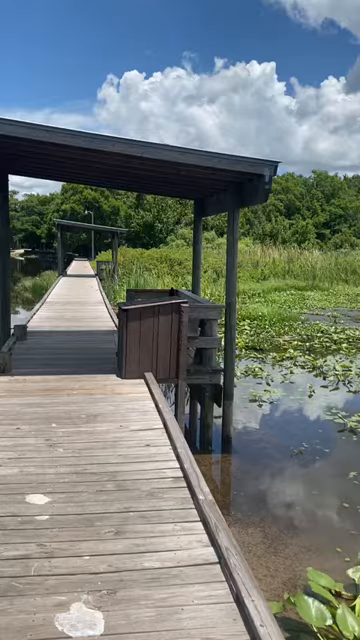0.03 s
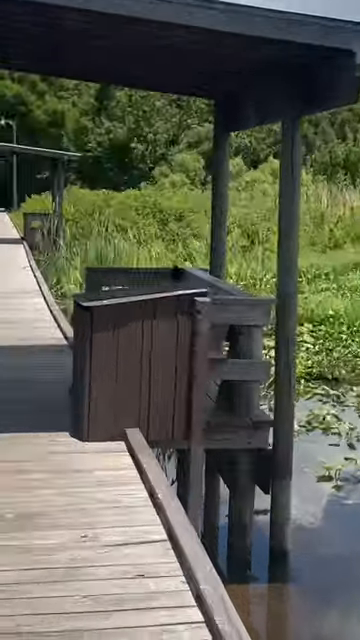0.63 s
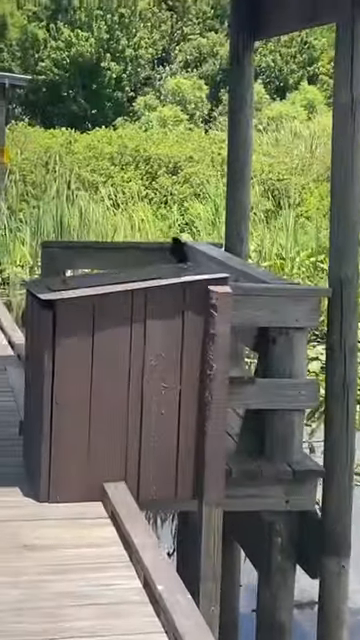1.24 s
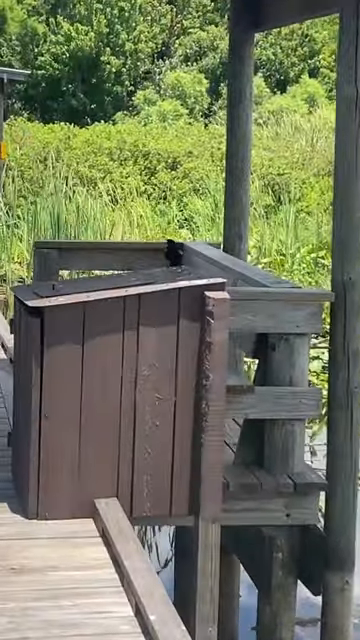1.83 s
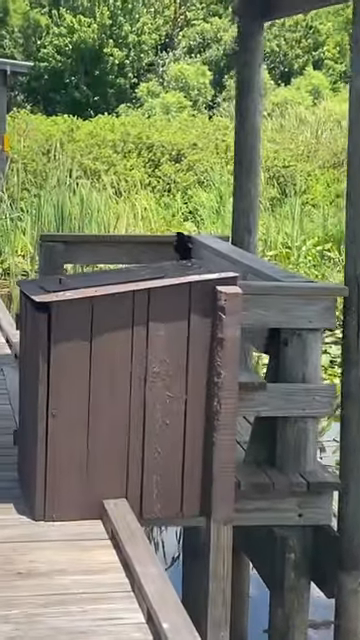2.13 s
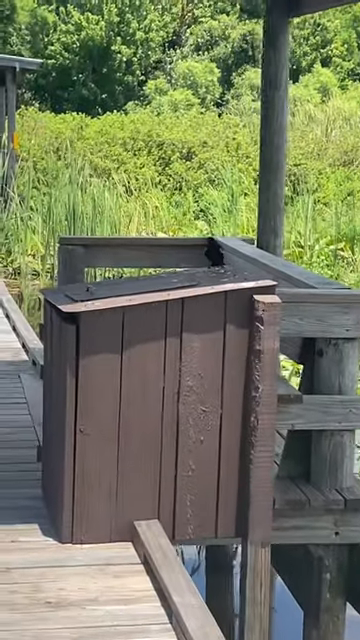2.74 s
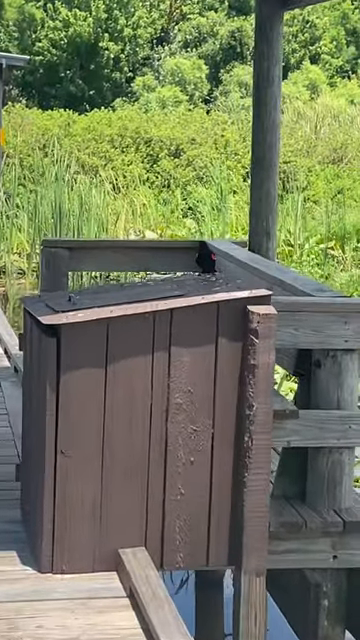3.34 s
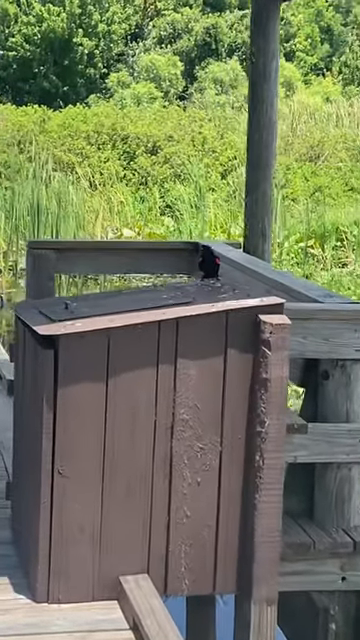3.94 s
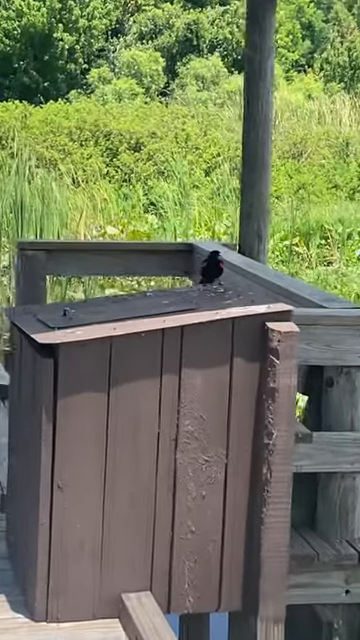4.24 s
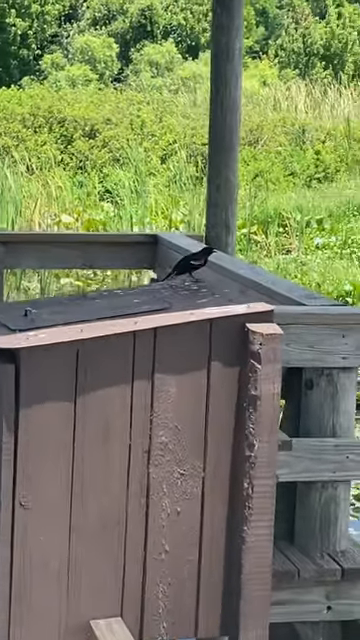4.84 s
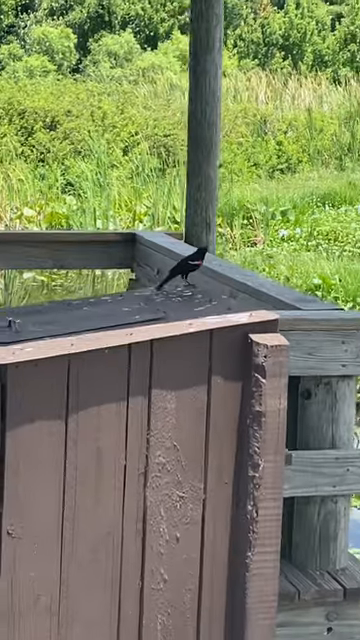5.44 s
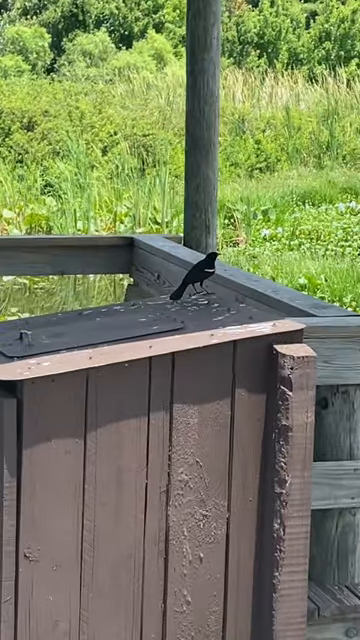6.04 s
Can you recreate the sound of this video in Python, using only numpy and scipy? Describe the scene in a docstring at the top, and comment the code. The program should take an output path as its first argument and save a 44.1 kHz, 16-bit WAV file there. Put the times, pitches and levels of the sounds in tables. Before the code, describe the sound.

An open marsh is heard through a hand-held microphone, with a steady low rumble and very faint insect hiss. At 0.2 seconds a nearby blackbird gives one loud, high, buzzy whistle that drops quickly and holds until about 0.7. A sharp, hollow finger knock on the microphone lands at 0.3, followed by lighter taps until 1.3 and one more at 3.4. A distant engine revs up until about 2.5 seconds, eases off around 3, then pulls again and hums on to the end. Farther birds answer with softer falling, buzzy calls at about 1.7, 2.6 and 3.2 seconds, blurred by the reeds. Faint, thin chips are scattered throughout. From 4 seconds the grip rubs softly, with a fine crackle and small dry ticks. A far bird gives three faint hoarse rattles between 5.4 and 6 seconds.

```python
"""A red-winged blackbird gives one loud, buzzy, falling whistle from a boardwalk in an open marsh.
A second vibration modulates its tone in pitch and level. Other birds answer and chip, blurred by
scattering in the reeds, while insects hiss over a low rumble. A distant engine revs up, eases off and
pulls again, sweeping its tones through fixed resonances. Fingers knock on the hand-held camera,
exciting the modes of its case, and rub it with a fine frictional crackle."""
import sys
import numpy as np
from scipy import signal
from scipy.fft import rfft, irfft, next_fast_len
from scipy.io import wavfile
from scipy.ndimage import uniform_filter1d, map_coordinates

SR = 44100
rng = np.random.default_rng(int(sys.argv[2]) if len(sys.argv) > 2 else 0)


def generate_wav(signal):
    """Clip the signal to [-1, 1] and save it as 16-bit WAV at the path in sys.argv[1]."""
    frames = np.transpose(np.atleast_2d(signal))
    scaled = np.clip(frames, -1, 1) * 32767
    pcm = np.round(scaled).astype(np.int16)
    wavfile.write(sys.argv[1], SR, pcm)


N = 268569
TIME = np.arange(N) / SR


def amp(db):
    """Decibels to amplitude ratio."""
    return 10 ** (np.asarray(db) / 20)


def unit(x):
    """Normalisation to rms 1."""
    return x / np.sqrt(np.mean(x ** 2) + 1e-20)


def along(points, hz):
    """Interpolation of (Hz, value) points on a logarithmic frequency axis."""
    f, v = np.transpose(points)
    return np.interp(np.log(hz + 1), np.log(f + 1), v)


def curves(rows):
    """Linear interpolation in time of each column after the first."""
    s, *cols = np.transpose(rows)
    return [np.interp(TIME, s, c) for c in cols]


def ramp(start, rise_s):
    """Linear rise from 0 to 1."""
    return np.clip((TIME - start) / rise_s, 0, 1)


def envelope(start, end, attack_s, release_s):
    """Trapezoidal envelope, 0 to 1."""
    return np.clip(np.minimum((TIME - start) / attack_s, (end - TIME) / release_s), 0, 1)


def during(rows):
    """Soft-edged gate over a table's time span."""
    return np.clip(np.minimum(TIME - rows[0][0], rows[-1][0] - TIME) / 0.0053 + .5, 0, 1)


def wobble(rate):
    """Smooth random modulation with rate knots a second."""
    return map_coordinates(rng.standard_normal(int(N * rate / SR) + 4), [TIME * rate])


def angle(hz):
    """Phase as the integral of frequency."""
    return 2 * np.pi * np.cumsum(hz) / SR


def filtered(x, response):
    """Filtering as multiplication by a frequency response."""
    m = next_fast_len(N + SR // 2)
    return irfft(rfft(x, m) * response(np.fft.rfftfreq(m, 1 / SR)), m)[..., :N]


def shaped(x, gains):
    """Zero-phase filtering by (Hz, dB) points."""
    return filtered(x, lambda hz: amp(along(gains, hz)))


def add(track, s, sound):
    """Superposition of a sound on a track at s seconds."""
    part = track[..., round(s * SR):][..., :sound.shape[-1]]
    part += sound[..., :part.shape[-1]]


# Likeness of left and right. Each row: frequency in Hz, correlation (clipped to -1..1 in use).
CORRELATION = [(60, 1.0), (120, 0.99), (240, 1), (480, 0.76), (950, -0.36), (1890, 0.95), (3770, 0.6),
               (7520, 0.11), (15000, -1.8)]

def noise(spectrum, patchy_db):
    """Partly coherent stereo noise of rms 1, with drifting patches of gain."""
    z = signal.stft(rng.standard_normal((2, N)), nperseg=1024)[2]
    patches = uniform_filter1d(rng.standard_normal(z.shape[1:]), size=7, axis=0)
    patches = unit(uniform_filter1d(patches, size=9, axis=1))
    pair = signal.istft(z * amp(patchy_db * patches), nperseg=1024)[1][:, :N]

    def mid_side_gains(hz):
        turn = np.arccos(np.clip(along(CORRELATION, hz), -1, 1)) / 2
        return amp(along(spectrum, hz)) * [np.cos(turn), np.sin(turn)]

    mid, side = filtered(pair, mid_side_gains)
    return unit(np.array([mid + side, mid - side]))


# Phase between the microphone ports. Each row: frequency in Hz, lead of the left in radians.
LEFT_LEAD = [(200, 0.5), (600, 0.5), (1200, 2), (1890, 1.2), (4050, 1.7), (4900, 1.4), (8000, 1.7),
             (10500, 2.6), (15000, 2.8)]

def ports(x, share):
    """Phase difference: a wave reaches the two ports out of step; share scales the lead."""
    return filtered(x, lambda hz: np.exp(.5j * share * along(LEFT_LEAD, hz) * np.array([[1], [-1]])))


# Echo of reeds and trees. Each row: frequency in Hz, time to decay by 60 dB in seconds.
MARSH_DECAY = [(500, .4), (3000, .9), (4450, 1.3), (5600, .6), (14000, .35)]

def outdoors(x, share, near_db, far_db):
    """Reverberation: scattering off nearby timber and far reeds adds two tails to the direct sound."""
    hz, t, z = signal.stft(rng.standard_normal((2, SR)), SR, nperseg=256)
    far = signal.istft(z * amp(-60 * t / along(MARSH_DECAY, hz)[:, None]), SR, nperseg=256)[1][:, :SR]
    near = rng.standard_normal((2, SR)) * amp(-60 * np.arange(SR) / SR / 0.11)
    tail = amp(far_db) * far / np.linalg.norm(far[0]) + amp(near_db) * near / np.linalg.norm(near[0])
    return ports(x, share) + signal.fftconvolve(np.atleast_2d(x), tail, axes=1)[:, :N]


# Spectra of the background. Each row: frequency in Hz, relative spectral level in dB.
RUMBLE_SPECTRUM = [(20, -42), (33, -14), (48, 17.5), (66, 20), (95, 13), (135, 7), (250, -54)]
INSECT_SPECTRUM = [(3000, -15), (5000, -23), (7100, -18), (7800, 6.5), (8050, -4), (8350, 1.5),
                   (9000, -24.5), (10500, -32.5), (15000, -56)]

def air():
    """Steady broadband noise: low rumble, a faint wash of open air and insect hiss."""
    wash_spectrum = [(100, 1.5), (200, 7), (400, -6.5), (900, -21), (2500, -31.5), (5000, -46.5)]
    rumble = amp(-47.5 + 0.5 * wobble(17)) * noise(RUMBLE_SPECTRUM, patchy_db=-0.65)
    wash = amp(-56) * noise(wash_spectrum, patchy_db=-3)
    return rumble + wash + amp(-79.5) * noise(INSECT_SPECTRUM, patchy_db=1)


# The dry hiss that opens the call. Each row: frequency in Hz, relative spectral level in dB.
HISS_SPECTRUM = [(3500, -47), (5000, -15), (6800, 0.5), (8300, -3), (11000, -14.5), (13500, -18.5),
                 (15500, -18)]

def throat_hiss():
    """Flow noise: air hisses through the bird's throat and decays exponentially."""
    start, fade_db_per_s = .2, 332.5
    level = ramp(start, rise_s=0.014) * amp(-45 - fade_db_per_s * np.clip(TIME - start, 0, None))
    return level * noise(HISS_SPECTRUM, patchy_db=2.5)[0]


# The near whistle's contour. Each row: time in seconds, pitch in Hz, relative level in dB.
WHISTLE = [(0.199, 7260, -54), (0.211, 6950, -35.5), (0.224, 6050, -28.5), (0.233, 5450, -39),
           (.256, 5100, -40), (0.28, 4890, -31), (.305, 4800, -28.5), (0.345, 4650, -24),
           (.38, 4560, -24.5), (.42, 4490, -24.5), (.495, 4435, -21), (0.559, 4465, -21.5),
           (0.619, 4540, -22.5), (.642, 4480, -31), (0.659, 4420, -52)]

def blackbird():
    """Frequency and amplitude modulation: a second vibration flicks the pitch and pinches the level."""
    hz, db = curves(WHISTLE)
    start, end = WHISTLE[0][0], WHISTLE[-1][0]
    # the fast buzz breaks to about half its rate, and the two mingle for a moment
    fast_hz, slow_hz, break_s, mingle_s = 262, 121, .353, .075
    slow, fast = ramp(break_s, .012), 1 - ramp(break_s, mingle_s)
    depth = envelope(start, end, attack_s=.005, release_s=.035)
    buzz = angle((slow_hz + fast * (fast_hz / 2 - slow_hz)) * (1 + .025 * wobble(150)))
    slow_shake, fast_shake = slow * np.cos(buzz), np.cos(2 * buzz + 0.5)
    squeak = np.clip((hz - 4780) / 600, 0, 1)  # the high opening swings wider and is ragged
    flick_hz = 148.8 * slow_shake + (fast * 115 + (1 - fast) * 70 + 130 * squeak) * fast_shake
    phase = angle(hz + depth * flick_hz + 12 * wobble(810))
    pinch = np.abs(1 - depth * (0.37 * slow_shake + (fast * 0.49 + (1 - fast) * 0.19) * fast_shake))
    flutter = during(WHISTLE) * amp(0.72 + (.7 + 1.3 * fast) * wobble(200))
    phase += .55 * squeak ** .5 * wobble(1000)
    hoarse_phase = phase + 0.45 * depth * np.sin(buzz) + 0.095 * wobble(1000)
    # the overtones follow the squeak's level, then hold a level of their own
    hold_s = 0.252
    edge = amp(-51) * envelope(hold_s, end, 0.026, 0.076) ** 2 + amp(db - 37.5) * (TIME < hold_s)
    overtones = edge * (amp(4.5) * np.sin(2 * hoarse_phase) + amp(9) * np.sin(3 * phase))
    overtones *= 1 + 0.23 * slow_shake + .15 * fast_shake
    # the whistle sounds wide and restless between the ears, then snaps into focus
    wide, lead_rad, scatter_rad = envelope(.255, .51, .02, .012), 2.9, .33
    apart = wide * np.array([side * lead_rad / 2 + scatter_rad * wobble(45) for side in (1, -1)])
    sway_db = wide * 1.5 * wobble(25) * np.array([[1], [-1]])
    voice = flutter * (amp(db + sway_db + 0.54) * pinch * np.sin(phase + apart) + overtones)
    throat = [(3600, -13.5), (4020, -2), (4500, 0.5), (5050, -0.5), (7000, -3), (10000, 5),
              (11000, -14.5), (12300, -4), (13200, 4.5), (14300, -1), (15500, -27)]
    return outdoors(shaped(voice, throat) + throat_hiss(), share=1, near_db=-19, far_db=-30.5)


# Upper modes of the case. Each row: frequency in Hz, relative level in dB, 60 dB decay time in seconds.
CASE_MODES = [(869, -5.5, 0.011), (1094, -1, 0.0081), (1650, -7.5, 0.008), (2250, -6.5, 0.021)]
# Finger knocks. Each row: start in seconds, relative level in dB, click level relative to that in dB,
# click tilt in dB per octave, ring frequency in Hz, ring decay time in seconds.
FINGER_KNOCKS = [(0.2996, -7, -17.5, 2.5, 528, 0.0094), (.347, -41, -18, 0, 517, 0.013),
                 (0.3893, -35.5, -18.5, -2, 502, 0.014), (0.4355, -35, -19, -2.5, 551, 0.0083),
                 (0.4543, -35.5, -8, -3.5, 537, .012), (0.486, -26, -7.5, -0.5, 557, 0.0056),
                 (0.497, -40, -13.5, -1.5, 545, .009), (0.502, -42, -3, -1.5, 528, 0.013),
                 (0.519, -42.5, -15, 0.5, 560, 0.0058), (.530, -42, -18.5, -3, 560, 0.0074),
                 (0.549, -45.5, -14.5, -2, 536, 0.011), (0.656, -45.5, -25, -3, 543, 0.0089),
                 (0.779, -47.5, -13, -6, 514, .008), (0.796, -38.5, -7.5, -10, 569, 0.0088),
                 (0.915, -40.5, -18, -3, 596, 0.0063), (1.2555, -35, -23, -9, 545, 0.0066),
                 (1.276, -38, -2, -14, 560, 0.006), (3.354, -33, -33, -10, 545, 0.008)]

def knocks(rise_s):
    """Impact excitation: the hollow case answers with a thump, a dull push, a click and a rattle."""
    t = np.arange(SR // 5) / SR
    push = t / .0014 * np.exp(-t / .0014)
    rattle_t60 = 0.1
    body, clicks, shaken = np.zeros((3, N))
    for s, db, click_db, tilt_db, body_hz, ring_s in FINGER_KNOCKS:
        decay = np.exp(-(t / ring_s) ** 2) + amp(-22.5 - 60 * t / 0.056)
        ring_hz = body_hz * (1 - 0.2 * np.exp(-t / 0.0026))  # the finger's load starts the ring low
        thump = (1 - np.exp(-(t / rise_s) ** 2)) * decay * np.sin(angle(ring_hz))
        add(body, s, amp(db) * (thump - 0.55 * push))
        for hz, mode_db, t60 in CASE_MODES:
            struck_db = mode_db + tilt_db * np.log2(hz / CASE_MODES[0][0]) + rng.normal(0, 2)
            mode = amp(struck_db - 60 * t / t60) * np.sin(2 * np.pi * hz * t)
            add(clicks, s - .0006, amp(db + click_db) * mode)
        add(shaken, s, amp(-27 + 0.85 * db - 60 * t / rattle_t60))
    rattle_spectrum = [(300, -26), (480, 1), (600, 1), (800, -5.5), (1100, -10), (1500, -20.5),
                       (2400, -26.5), (3200, -34), (6000, -63.5)]
    rattle = shaken * amp(2.8 * wobble(300)) * noise(rattle_spectrum, patchy_db=5)[0]
    soft_skin = [(600, 0), (800, -11.5), (1200, -8.5)]
    shell = [(300, -8), (700, 5), (2500, -6.5), (3100, -32), (6000, -26.5), (12000, -40)]
    return ports(shaped(body, soft_skin) + shaped(clicks, shell) + rattle, share=0.89)


# Engine speed. Each row: time in seconds, shaft turns per second.
SHAFT_SPEED = [(.3, 8.3), (.6, 13), (1, 20.4), (1.2, 25), (1.4, 28.3), (1.9, 29.7), (2.2, 33.6),
               (2.5, 35.4), (2.7, 34.2), (3.05, 28.6), (3.5, 32.2), (4.25, 33), (4.6, 34.7), (5, 37.2),
               (5.5, 38.2), (6.09, 38.4)]
# How well the engine's noise carries. Each row: time in seconds, gain in dB.
TRANSMISSION = [(.3, -12), (1.4, -4), (2, -3.5), (2.55, 1), (3.2, -0.5), (4.2, 0), (5, 0.5), (6.09, -0.5)]
# Deep tones. Each row: multiple of the shaft rate, cruising level in dB before the resonances,
# growth in dB per doubling of speed.
DEEP_ORDERS = [(3, -42, 3), (5, -55.5, -8)]
# Upper tones. Each row: multiple of the shaft rate, level relative to the roar in dB before the
# resonances, change under load in dB.
UPPER_ORDERS = [(2, -10, -6), (3.2, -9.5, 5), (5.5, -11.5, -3), (6, -13, 8), (7, -14, -11.5),
                (7.5, -13.5, 7), (8, -4.5, -7.5), (8.5, -9.5, 7), (9, -14, 3.5), (10, -19.5, 0),
                (12, -16, -0.5), (14, -22.5, 2)]
# Resonances that the tones sweep through. Each row: frequency in Hz, gain in dB.
RESONANCES = [(44, -17.5), (56, 6), (66, 4), (77, -16.5), (92, -0.5), (106, 1), (116, 1), (130, -2.5),
              (146, 7), (168, -5.5), (196, 4.5), (214, 3.5), (232, 4), (256, -3.5), (283, -1), (310, -8),
              (342, 6), (400, 5.5)]
# Exhaust roar and the higher rush. Each row: frequency in Hz, relative spectral level in dB.
ROAR_SPECTRUM = [(60, -2), (130, -7), (230, 1), (340, -1), (440, -5.5), (540, -6.5), (680, -14.5),
                 (1000, -20), (2000, -83.5)]
RUSH_SPECTRUM = [(300, -11.5), (700, 6.5), (1150, 5), (1600, 5), (2100, -1.5), (2700, -8), (4200, -12.5),
                 (5000, -34), (7000, -34.5), (8500, -25), (9500, -60.5), (14000, -53)]

def engine():
    """Forced vibration: multiples of the shaft rate sweep through resonances; noise grows with speed."""
    turns, carry_db = curves(SHAFT_SPEED)[0], curves(TRANSMISSION)[0]
    cruise_turns_per_s = 35
    doublings = np.log2(turns / cruise_turns_per_s)
    roar_db = -43.5 + 12 * doublings + carry_db
    rush_db = -58 + 19 * doublings + 1.2 * carry_db
    load = ramp(3.32, rise_s=0.88)  # in the last pull, several tones stand clear of the roar
    shaft = angle(turns * (1 + 0.0044 * wobble(14)))
    tones = np.zeros(N)
    for order, db, growth_db in DEEP_ORDERS:
        tone_db = db + growth_db * doublings + along(RESONANCES, order * turns) + 3.2 * wobble(12)
        tones += amp(tone_db) * np.sin(order * shaft + 0.45 * wobble(22))
    for order, db, load_db in UPPER_ORDERS:
        tone_db = roar_db + db + load_db * load + along(RESONANCES, order * turns) + 3 * wobble(6)
        tones += amp(tone_db) * np.sin(order * shaft + .45 * wobble(9))
    drift = wobble(8)
    roar = amp(roar_db - load + 0.42 * drift) * noise(ROAR_SPECTRUM, patchy_db=2)
    rush = amp(rush_db + 0.9 * drift) * noise(RUSH_SPECTRUM, patchy_db=0.6)
    return tones + roar + rush


def glide(length, start_hz, end_hz, rasp_hz):
    """Exponential sweep: one swelling note, roughened by random frequency modulation."""
    u = np.linspace(0, 1, round(length * SR))
    rasp = rasp_hz * unit(uniform_filter1d(rng.standard_normal(SR // 4), size=30))[:len(u)]
    return np.abs(np.sin(np.pi * u)) ** 3.1 * np.sin(angle(start_hz * (end_hz / start_hz) ** u + rasp))


# Falling chips from the reeds. Each row: start in seconds, relative level in dB.
REED_CHIPS = [(.658, -64.5), (1.033, -66), (1.27, -61.5), (1.698, -65), (2.03, -65.5), (2.36, -63.5),
              (2.588, -61.5), (2.945, -67), (3.175, -60), (3.432, -61.5), (3.836, -63), (4.177, -62),
              (4.503, -60), (4.616, -61), (4.853, -62), (5.14, -63), (5.433, -60.5), (5.768, -63)]
# Scattered notes. Each row: start and length in seconds, first and last pitch in Hz, level in dB,
# rms pitch jitter in Hz.
BIRD_NOTES = [(1.927, 0.051, 4330, 3120, -64.5, 40.1), (3.095, 0.089, 3940, 4000, -76, 255),
              (4.816, .04, 4050, 3500, -62.5, 59), (4.961, 0.013, 4250, 5120, -60, 99),
              (4.971, 0.025, 5210, 5140, -58, 150.3)]
# A hoarse far bird. Each row: start and length in seconds, relative level in dB.
HOARSE_RATTLES = [(5.41, .09, -63), (5.665, .085, -60.5), (5.946, .12, -63)]

def small_birds():
    """Fast frequency sweeps make chips and notes; amplitude-modulated noise makes hoarse rattles."""
    chips, others = np.zeros((2, N))
    for s, db in REED_CHIPS:
        add(chips, s - .003, amp(db - 7.5) * glide(0.025, start_hz=9900, end_hz=4700, rasp_hz=300))
    t = np.arange(SR // 4) / SR
    reed_tail = rng.standard_normal(len(t)) * amp(-60 * t / .2)
    chips += .9 * signal.fftconvolve(chips, reed_tail / np.linalg.norm(reed_tail))[:N]
    for s, length, start_hz, end_hz, db, rasp_hz in BIRD_NOTES:
        add(others, s, amp(db) * glide(length, start_hz, end_hz, rasp_hz))
    rasp = noise([(2400, -57.5), (3300, -6), (3800, -1), (4250, 4), (5000, -45)], patchy_db=1)[0]
    rasp *= 1 + np.sin(angle(65 + 6 * wobble(28)))
    for s, length, db in HOARSE_RATTLES:
        others += amp(db - 4) * np.sin(np.pi * np.clip((TIME - s) / length, 0, 1)) * rasp
    return outdoors(chips + others, share=.6, near_db=-5, far_db=-14)


# Answering calls. Each row: start and length in seconds, first and limiting pitch in Hz, time constant
# of the fall in seconds, settled level in dB, swell as the pitch settles in dB, relative overtone in dB.
ANSWER_CALLS = [(1.691, 0.41, 4840, 4365, 0.076, -68, 6, -39),
                (2.618, 0.36, 6820, 4553, 0.062, -60, 22, -22),
                (3.195, 0.38, 6110, 4340, 0.084, -66.5, 14.5, -29.5)]

def answers():
    """The same modulated, falling tone from farther birds, blurred by reverberation in the reeds."""
    calls = np.zeros(N)
    for s, length, start_hz, final_hz, fall_s, db, swell_db, overtone_db in ANSWER_CALLS:
        hz = final_hz + (start_hz - final_hz) * np.exp(-np.clip(TIME - s, 0, None) / fall_s)
        unsettled = np.clip((hz - 4540) / 350, 0, 1)
        squeak = np.clip((hz - 5200) / 900, 0, 1)  # the high, ragged opening stands out of the dip
        jitter_hz = 35 + 40 * unsettled + 330 * squeak
        buzz = angle(125 + 8 * wobble(76))
        phase = angle(hz + 80 * np.sin(buzz) + jitter_hz * wobble(990))
        shake = (1 - .35 * np.cos(buzz)) * amp(2.5 * wobble(45))
        gate = envelope(s, s + length, attack_s=0.054, release_s=0.063)
        level = gate * amp(db - swell_db * unsettled + 8.5 * np.sqrt(squeak))
        calls += level * shake * (np.sin(phase) + amp(overtone_db) * np.sin(2 * phase))
    return outdoors(calls, share=.7, near_db=-4, far_db=-5.5)


# Rubbing of the grip. Each row: time in seconds, level in dB.
RUB_LEVEL = [(4.02, -84), (4.1, -66), (4.13, -71), (4.24, -72), (4.36, -79), (4.43, -74), (4.57, -78),
             (4.7, -71.5), (4.8, -78), (5.1, -81.5), (5.6, -81.5), (6.09, -83)]
# Dry ticks of the grip. Each row: start in seconds, relative level in dB.
GRIP_TICKS = [(4.113, -51.5), (4.149, -58.5), (4.2198, -59), (4.325, -67), (4.519, -53.5), (4.569, -62),
              (4.626, -56), (4.6848, -62), (4.704, -53), (4.8155, -56), (5.043, -54.5), (5.09, -62.5),
              (5.4236, -57.5), (5.576, -53), (5.5862, -53.5), (5.915, -63.5)]

def grip():
    """Friction: skin rubs and ticks on the case, and its tiny slips make a fine crackle."""
    slips_per_s, crackle_db, tick_t60 = 420, -10, 0.013
    t = np.arange(SR // 20) / SR
    spectrum = [(1000, -17), (3000, 13.5), (7000, 6), (9000, 4.5), (11500, 3), (13000, -11), (15000, -35)]
    rub = amp(curves(RUB_LEVEL)[0] + 3 * wobble(110)) * (TIME > RUB_LEVEL[0][0])
    slips = (rng.random(N) < slips_per_s / SR) * rng.standard_normal((2, N))
    crackle = amp(crackle_db) * rub * unit(shaped(slips, spectrum))
    ticks = np.zeros(N)
    for s, db in GRIP_TICKS:
        add(ticks, s, amp(db - 9 - 60 * t / tick_t60))
    return (rub + ticks) * noise(spectrum, patchy_db=-4) + crackle


def scene():
    """Superposition of birds, engine, air and handling at the two ports."""
    return blackbird() + answers() + small_birds() + engine() + air() + knocks(rise_s=.0016) + grip()


# Level difference between the ports. Each row: frequency in Hz, left minus right in dB.
BALANCE = [(110, 0), (200, -.5), (380, -2.3), (650, -2.4), (1100, .5), (2400, 0)]

def record(dry):
    """Band limiting: the camera sheds deep bass and top treble; its low mids lean to the right."""
    started = dry * envelope(.033, N / SR, .0044, .004)  # the camera starts a moment late
    low_cut, top_hz = [(18, -45), (27, -21), (34, -7), (46, 0)], 15700
    sides = np.array([[.5], [-.5]])
    response = lambda hz: (hz < top_hz) * amp(along(low_cut, hz) + along(BALANCE, hz) * sides)
    return filtered(started, response)


dry = scene()
out = record(dry)
generate_wav(out)
```